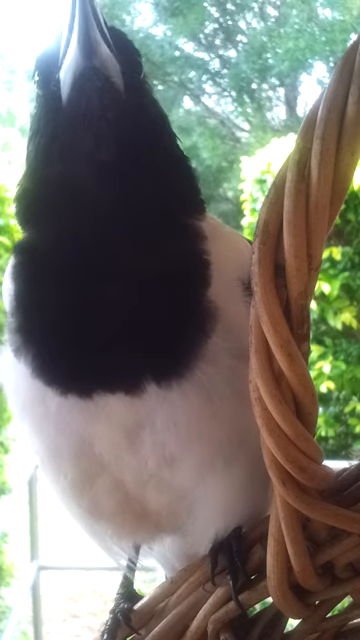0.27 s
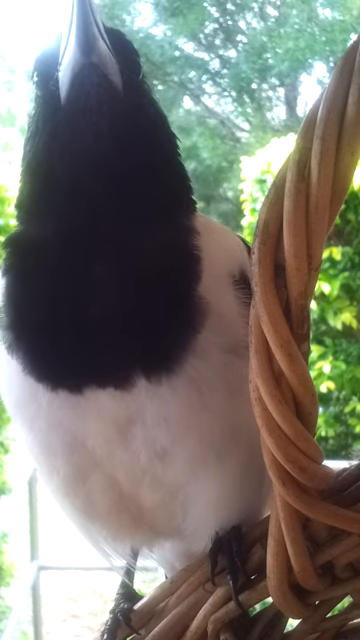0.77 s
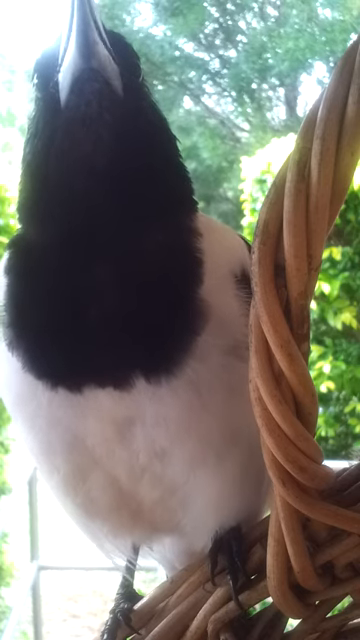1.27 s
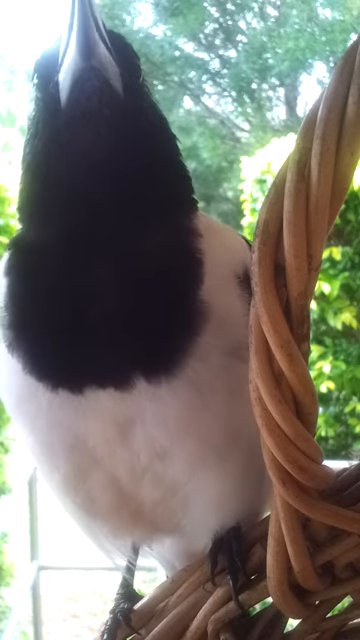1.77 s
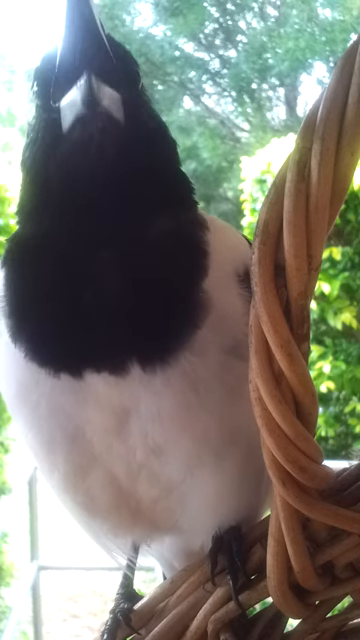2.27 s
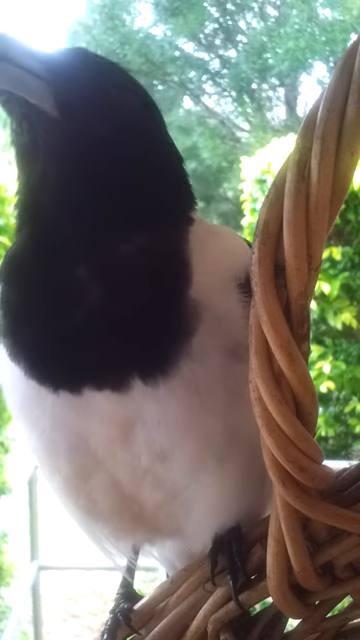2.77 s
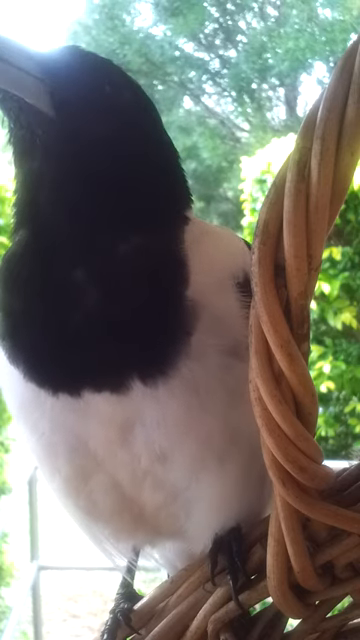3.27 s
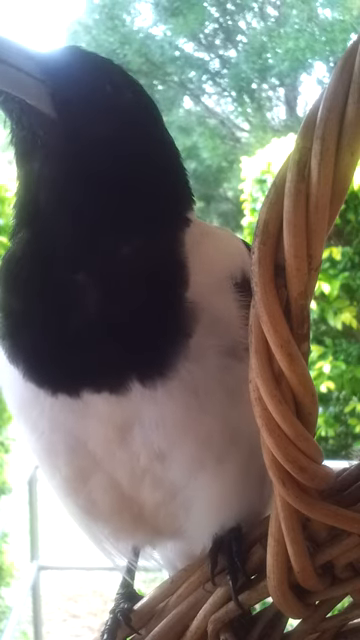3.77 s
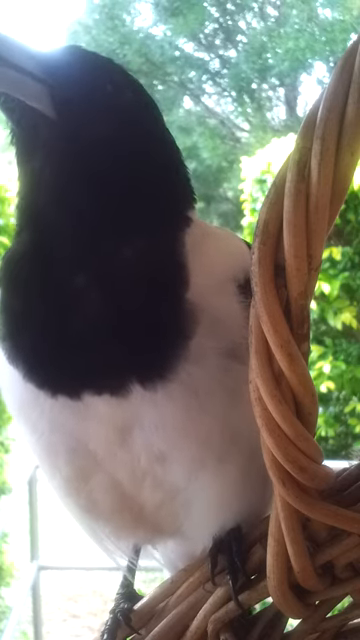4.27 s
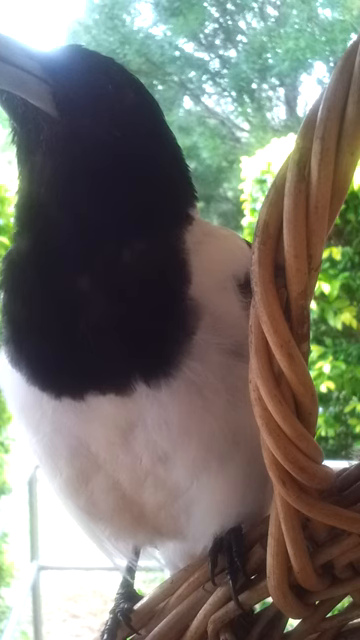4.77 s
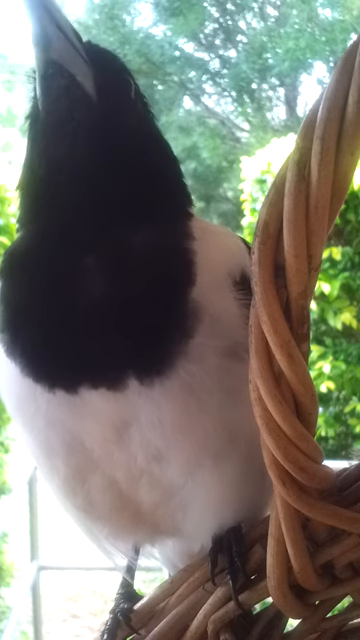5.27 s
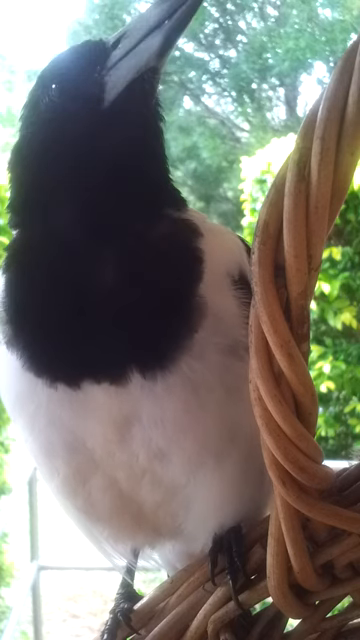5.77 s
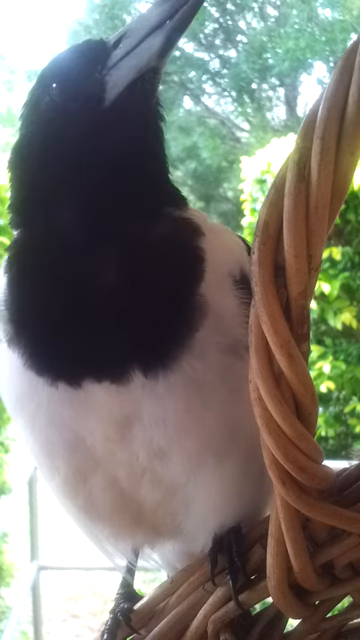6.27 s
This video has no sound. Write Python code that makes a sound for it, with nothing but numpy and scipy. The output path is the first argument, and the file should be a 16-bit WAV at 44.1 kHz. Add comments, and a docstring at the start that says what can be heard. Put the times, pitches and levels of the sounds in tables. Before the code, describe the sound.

A butcherbird sings loudly up close in whistles, slides and trilled chirps, over faint distant birds and softly rustling leaves.

```python
"""Butcherbird on a porch

A butcherbird sings an arm's length from a phone: whistles, slides and trilled chirps, near sines whose
partials are coloured by throat and beak, loud enough to overload the microphones. Porch and garden
ring after each note. Behind it, other birds whistle far off and leaves rustle in surges of noise."""
import sys
import numpy as np
from scipy import signal
from scipy.fft import rfft, irfft, next_fast_len
from scipy.io import wavfile
from scipy.ndimage import uniform_filter1d

SR = 44100
rng = np.random.default_rng(int(sys.argv[2]) if len(sys.argv) > 2 else 0)


def transcribe(u):
    """Save the signal u as a 16-bit wav file named by the first command-line argument.

    u: samples, shape (n,) or (channels, n), limited to [-1, 1]; the rate is SR.
    q: integer samples, one column per channel.
    """
    v = np.clip(np.atleast_2d(u).T, -1, 1)
    q = np.round(v * 32767).astype(np.int16)
    wavfile.write(sys.argv[1], SR, q)


N = 287973

# Pitch curve of each note, as breakpoints: t/s, f/Hz
MELODY = [
    [(0, 1229), (.2, 1254), (.25, 1217), (.264, 1107)],
    [(1.044, 1374), (1.058, 1935), (1.068, 2173)],
    [(1.066, 2075), (1.082, 1755), (1.104, 1648), (1.172, 1578), (1.188, 1630)],
    [(1.507, 681), (1.529, 904.6), (1.567, 1081), (1.609, 1046), (1.689, 863), (1.709, 730)],
    [(1.806, 461.4), (1.824, 658), (1.842, 771.6), (1.886, 508)],
    [(2.247, 1766), (2.263, 1287), (2.278, 1231), (2.284, 1426)],
    [(2.282, 1343), (2.287, 1726), (2.294, 2354)],
    [(2.291, 2613), (2.299, 3240), (2.325, 3080), (2.357, 3224), (2.38, 3506)],
    [(2.448, 4710), (2.456, 4254), (2.47, 3338), (2.492, 3240), (2.52, 3426)],
    [(2.547, 3545), (2.565, 3560), (2.599, 3189), (2.62, 3167), (2.647, 2995), (2.68, 3170)],
    [(3.35, 1273), (3.364, 1980), (3.374, 2021), (3.396, 1747), (3.444, 1505), (3.482, 1567)],
    [(3.96, 790), (3.982, 1031), (4.016, 1075), (4.058, 1090), (4.108, 875), (4.128, 726)],
    [(4.295, 618), (4.303, 572), (4.321, 463.6), (4.377, 647), (4.405, 678.5), (4.435, 564)],
    [(4.563, 416), (4.585, 609), (4.599, 684), (4.637, 655.7), (4.659, 558)],
    [(4.994, 2863), (5.012, 2900), (5.026, 3708), (5.036, 3936), (5.052, 3334), (5.098, 2980),
     (5.124, 2836), (5.186, 2773), (5.22, 2580)],
    [(6.36, 1268), (6.427, 1252), (6.442, 1056)],
    [(6.438, 1163), (6.448, 875), (6.458, 799), (6.476, 1052), (6.512, 1003)],
]
# Envelope and tone of each note: crest level/dB, crest position/share of note, swell/dB, sag/dB,
# attack/s, release/s, throat centre/Hz, throat width/Hz, 2nd partial/dB, 3rd partial/dB,
# upper partials/dB, overtone fade across the note/dB
VOICING = [(-6.5, 0.73, 1.5, 3, 0.00078, 0.008, 1220, 2400, -44.5, -43, -43, 14),
           (-25, 0.58, -3, 3, 0.0048, 0.0032, 1100, 2400, -40, -40, -40, 11),
           (10, 0.35, 4.5, 8.5, 0.021, .01, 1980, 1630, -26, -28, -33, 4.5),
           (-6, 0.29, 4, 9, 0.014, 0.0062, 1505, 3300, 2, -19, -10.5, -3.5),
           (-4, 0.41, 4, 6.5, 0.015, 0.0062, 1500, 2670, -2.5, -14, -14.5, 2),
           (8.5, 0.76, 7.5, -0.5, 0.024, 0.0024, 2760, 2630, -23.5, -8, -8.5, 0),
           (5, 0.51, 8.5, 8, 0.0035, 0.0045, 3500, 2900, -7, -9.5, -0.5, -1.5),
           (3, 0.9, 1, 9, 0.0088, 0.022, 3200, 4700, -12.5, -10, -20, 2.5),
           (3, 0.62, 6, 4.5, .012, 0.034, 3330, 1700, -11.5, -15.5, -31, -12),
           (9, .38, 15, 9.5, 0.02, 0.0088, 3200, 1200, -14.5, -40.5, -46, 1),
           (4.5, 0.47, 5, 2.5, .03, 0.028, 1700, 1140, -31.5, -42, -35.5, -14),
           (-5.5, .3, 0, 7, 0.05, 0.0074, 1470, 1950, 2.5, -15, -8.5, 0),
           (-3.5, 1, 10, 4, 0.0054, .012, 734, 630, 2.5, 5.5, -23, 20),
           (1, .62, 11, 11, 0.012, 0.0058, 744, 302, 4, 4, -10.5, 22),
           (5.5, 0.34, 12, 7.5, 0.022, 0.024, 3300, 1000, 0.5, -4.5, -5, -1),
           (0, 0.31, 15, -2, .012, .01, 1255, 2200, -34.5, -33, -44, -3),
           (-5, 0.34, -2.5, 9.5, 0.0074, 0.0097, 1140, 780, -8, -25, -17, 14)]
# Trills: t/s of one flick's top, rate/Hz, swing/share of pitch, dip/dB, sharpness, unevenness/cycles
TRILLS = [(0.029, 20.52, 0.069, 21.5, 4.1, 0.0021), (1.091, 75, 0.092, 3, 1.17, 0.114),
          (1.565, 65.9, 0.13, 5.5, 2.1, 0.066), (3.415, 67.9, 0.069, 1.5, 0.38, 0.13),
          (3.999, 67.6, 0.11, 5.5, 2.5, 0.047)]
def butcherbird(roughness=0.24):
    """The lead voice, note by note; tiny unevenness of its cycles blurs the high partials most."""
    jitter = roughness * uniform_filter1d(rng.standard_normal(N), size=30)
    drift = walk(50)
    out = np.zeros(N)
    for pitch, voicing in zip(MELODY, VOICING):
        start, end = pitch[0][0], pitch[-1][0]
        span, t, hz, fade = glide(pitch, fade_s=0.0017)
        progress = (t - start) / (end - start)
        db = envelope_db(t, start, end, *voicing[:6])
        for top_s, rate_hz, swing, dip_db, sharpness, uneven in TRILLS:
            if start <= top_s < end:  # the pitch flicks up while the level dips
                cycles = rate_hz * (t - top_s) + uneven * drift[span]
                flick = np.abs(np.cos(np.pi * cycles)) ** (2 * sharpness)
                flick -= flick.mean()
                hz = hz * (1 + swing * flick)
                db = db - dip_db * flick
        tone = throat(hz, progress, jitter[span], *voicing[6:])
        out[span] += np.sqrt(2) * undb(db) * fade * tone
    return out


def glide(pitch, fade_s):
    """A smoothed slide through (t/s, f/Hz) points: its sample span, times, pitch and end fades."""
    times, pitches = np.transpose(pitch)
    start, end = times[0] - fade_s, times[-1] + fade_s
    span = np.arange(int(max(start, 0) * SR), min(int(end * SR), N))
    t = span / SR
    hz = uniform_filter1d(np.interp(t, times, pitches), size=90, mode="nearest")
    fade = np.clip(np.minimum(t - start, end - t) / fade_s, 0, 1)
    return span, t, hz, fade


def envelope_db(t, start, end, level_db, crest, swell_db, sag_db, attack_s, release_s, edge_db=26):
    """One note's dynamics: attack, swell to the crest, sag, release."""
    contour_db = np.interp((t - start) / (end - start), [0, crest, 1], [swell_db, 0, sag_db])
    attack = np.clip(1 - (t - start) / attack_s, 0, 1)
    release = np.clip(1 - (end - t) / release_s, 0, 1)
    return level_db - contour_db - edge_db * (attack ** 2 + release ** 2)


# Windpipe and beak EQ on the partials from the fourth up: f/Hz, level/dB
BEAK_EQ = [(2000, -19.5), (4200, -28.5), (6000, -27), (8000, -42.5), (10000, -9.5), (11500, -53),
           (13000, -35.5), (16000, -60)]
def throat(hz, progress, jitter, centre_hz, width_hz, second_db, third_db, upper_db, thin_db):
    """Fifteen partials: a steep resonance colours the first three, windpipe and beak the rest."""
    def resonance(f):
        return 1 / (1 + ((f - centre_hz ** 2 / f) / width_hz) ** 2)

    phase = 2 * np.pi * np.cumsum(hz) / SR
    thinning_db = thin_db * progress
    tone = resonance(hz) * np.sin(phase)
    for k, db in [(2, second_db), (3, third_db)]:
        tone += resonance(k * hz) * undb(db - thinning_db) * np.sin(k * (phase + .4 * jitter))
    for k in range(4, 16):
        beak_db = np.interp(k * hz, *np.transpose(BEAK_EQ), right=-120)
        tone += undb(beak_db + upper_db - thinning_db) * np.sin(k * (phase + jitter))
    return tone


def porch_and_garden(send, shared=0.19, treble_hz=3500, rise_s=0.013):
    """Quick porch echoes and a garden tail that loses its treble first; returns centre and sides."""
    porch_db, porch_t60_s = -11.5, 0.089
    garden_db, garden_t60_s, treble_t60_s = -14, 0.57, 0.43
    t = np.arange(SR) / SR
    noise = rng.standard_normal((3, SR))
    low = signal.sosfilt(signal.butter(2, treble_hz, fs=SR, output="sos"), noise)
    garden = low * undb(-60 * t / garden_t60_s) + (noise - low) * undb(-60 * t / treble_t60_s)
    garden *= undb(garden_db) / np.sqrt(garden_t60_s)
    porch = noise * undb(porch_db - 60 * t / porch_t60_s) / np.sqrt(porch_t60_s)
    tails = (garden + porch) * (1 - np.exp(-t / rise_s)) * np.sqrt(2 * np.log(1000) / SR)
    wet = signal.fftconvolve(send[None], tails, axes=1)[:, :N]
    return np.sqrt(shared) * wet[0], np.sqrt(1 - shared) * wet[1:]


# Distant calls: start t/s, end t/s, start f/Hz, end f/Hz, level/dB
FAR_CALLS = [(.45, .68, 1204, 1204, -49), (1.0, 1.4, 1204, 1204, -46), (1.9, 2.15, 1205, 1203, -39),
             (2.53, 2.93, 1203, 1203, -43), (.55, .72, 4970, 5170, -58), (.84, 1.04, 4920, 5170, -58),
             (1.9, 2.08, 5150, 5210, -59), (3.82, 3.9, 5000, 5050, -60), (3.1, 3.125, 3480, 3470, -51),
             (3.22, 3.24, 3950, 3930, -50), (3.285, 3.36, 3050, 3480, -52)]
def far_birds(waver_db=1.2):
    """Thin whistles that waver on their way through the trees."""
    out = np.zeros(N)
    for start, end, first_hz, last_hz, db in FAR_CALLS:
        span, _, hz, fade = glide([(start, first_hz), (end, last_hz)], fade_s=0.015)
        out[span] += np.sqrt(2) * undb(db) * fade * np.sin(2 * np.pi * np.cumsum(hz) / SR)
    return out * undb(waver_db * walk(40))


# Sudden stirs in the foliage: t/s, relative level/dB
STIRS = [(.346, 2.5), (.415, 3), (.711, -5), (1.343, -1.5), (2.165, 0.5), (3.626, -1), (3.731, -3.5),
         (4.726, -3), (5.385, -9.5), (5.782, -6.5)]
def leaf_stirs(rise_s=0.004, t60_s=0.14):
    """Envelope of sudden rustles: the cued accents plus 40 mostly smaller ones at random."""
    t = np.arange(N) / SR
    chance = rng.random((40, 2))
    scattered = np.c_[chance[:, 0] * N / SR, -7 + 6 * chance[:, 1]]
    envelope = np.zeros(N)
    for start, db in [*STIRS, *scattered]:
        age = t[t > start] - start
        envelope[t > start] += undb(db - 60 * age / t60_s) * (1 - np.exp(-age / rise_s))
    return envelope


# Tone of the leaf bed: f/Hz, relative level/dB
LEAF_EQ = [(24, -58), (40, -40.5), (182, -18), (329, -7.5), (541, -4), (980, -2.5), (1140, -2),
           (1230, -0.5), (1460, -5.5), (2710, -10), (3560, -13.5), (12600, -18), (15000, -24.5)]
def leaves(level_db=-38.5):
    """Wide bands of rustle that surge together and flicker alone; returns centre and sides."""
    stirs = leaf_stirs()
    surge_db = 1.1 * walk(15) + 0.31 * walk(0.41)
    eq_hz, eq_db = np.transpose(LEAF_EQ)
    size = next_fast_len(N, real=True)
    f = np.fft.rfftfreq(size, 1 / SR) + 1
    spectrum = rfft(rng.standard_normal((3, size))) * undb(np.interp(np.log(f), np.log(eq_hz), eq_db))
    # wind on the ports in the bass and scattered treble differ left and right
    shared = np.interp(np.log(f), np.log([130, 290, 800, 1500, 8000]), [0.13, 0.87, 0.97, 0.29, 0.033])
    spectrum *= np.sqrt([shared, 1 - shared, 1 - shared])
    edges_hz, stir_depths = [0, 250, 700, 2000, 6000, SR], [0, 1.83, 2.22, 3.49, 3.1]
    out = 0
    for low_hz, high_hz, depth in zip(edges_hz, edges_hz[1:], stir_depths):
        band = irfft(spectrum * ((f >= low_hz) & (f < high_hz)), size)[:, :N]
        out = out + band * undb(surge_db + 1.22 * walk(14)) * (1 + depth * stirs)
    out *= undb(level_db) / np.sqrt(np.mean(out[0] ** 2 + out[1] ** 2))
    return out[0], out[1:]


# Stereo image of the phone's two microphone ports: f/Hz, left minus right level/dB, left phase lead/rad
PORT_IMAGE = [(300, 0, -.2), (680, 0, -.45), (1000, 6, -1.3), (1250, 6, -1.9), (1600, 4, -2.8),
              (2050, -2, -3.8), (3200, -5.5, -4.7), (4000, -6, -5.9), (5500, 0, -9), (9000, -3, -14),
              (16000, -2, -25)]
def microphone_ports(mono):
    """One sound as the two ports hear it: shaded by the phone's body and a little late on the left."""
    hz, db, lead = np.transpose(PORT_IMAGE)
    size = next_fast_len(N, real=True)
    f = np.fft.rfftfreq(size, 1 / SR)
    left = undb(np.interp(f, hz, db) / 2) * np.exp(.5j * np.interp(f, hz, lead))
    return irfft(rfft(mono, size) * np.array([left, 1 / left]), size)[:, :N]


def undb(db):
    """Decibels to linear gain."""
    return 10 ** (np.asarray(db) / 20)


def walk(rate_hz, step=64):
    """Random modulator: sample-and-hold, smoothed twice, with a spread near 1."""
    hold = max(int(SR / step / rate_hz), 1)
    coarse = np.repeat(rng.standard_normal(N // step + 1), hold)[:N // step + 1]
    coarse = uniform_filter1d(uniform_filter1d(coarse, hold), hold)
    return np.interp(np.arange(N) / step, np.arange(len(coarse)), coarse / coarse.std())


def scene():
    """The stereo mix: butcherbird up front, far birds with a bigger reverb send, leaves underneath."""
    bird, far = butcherbird(), far_birds()
    echo, echo_sides = porch_and_garden(bird + 3 * far)
    rustle, rustle_sides = leaves()
    return microphone_ports(bird + far + echo + rustle) + echo_sides + rustle_sides


def record(dry, knee=0.32, strength=0.36, follow_s=0.019, asymmetry=0.0082, top_hz=14800):
    """Gain control turns loud moments down, the converter clips a little unevenly, the top is cut."""
    pole = np.exp(-1 / (follow_s * SR))
    loudness = signal.lfilter([1 - pole], [1, -pole], np.abs(dry).max(axis=0))
    compressed = dry * (1 + loudness / knee) ** -strength
    clipped = np.clip(compressed + asymmetry * compressed ** 2, -1, 1)
    return signal.sosfilt(signal.ellip(8, .1, 40, top_hz, fs=SR, output="sos"), clipped)


dry = scene()
out = record(dry)
transcribe(out)
```